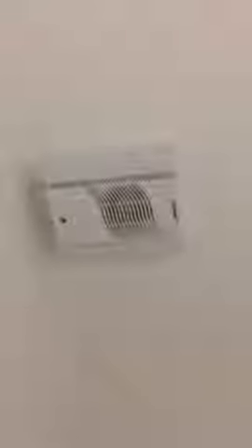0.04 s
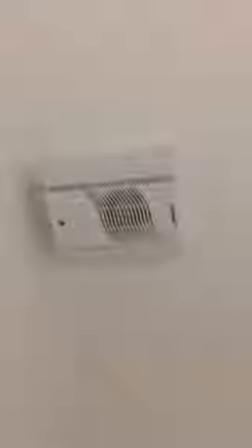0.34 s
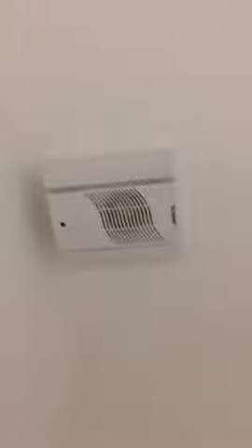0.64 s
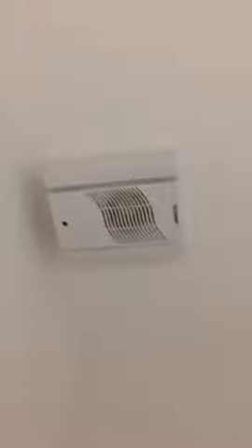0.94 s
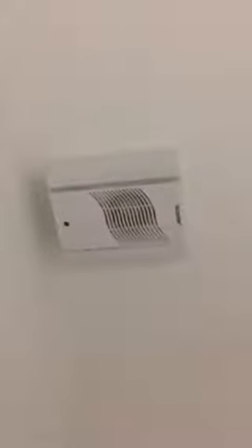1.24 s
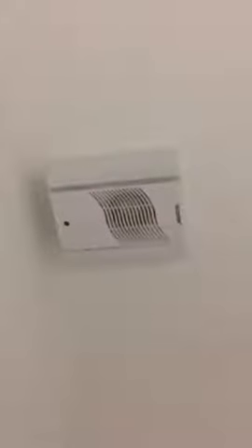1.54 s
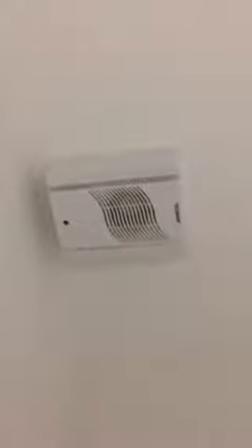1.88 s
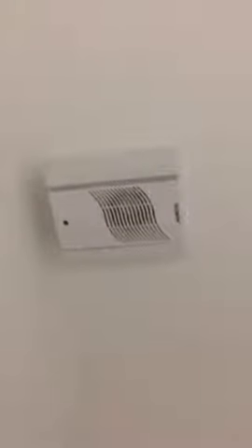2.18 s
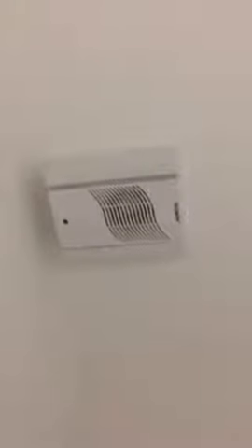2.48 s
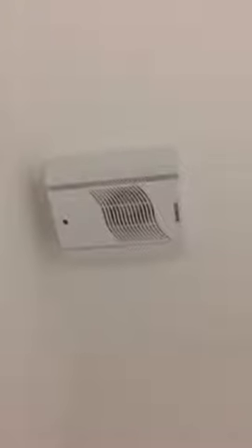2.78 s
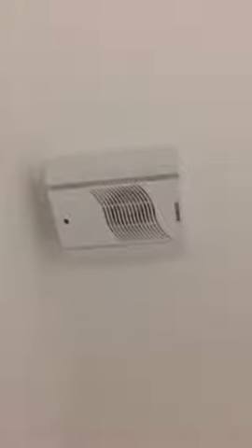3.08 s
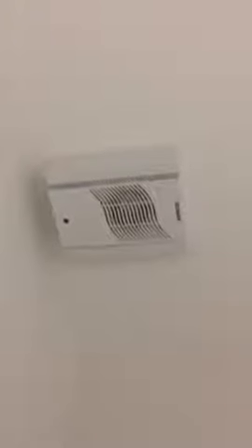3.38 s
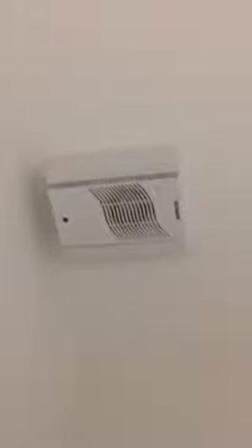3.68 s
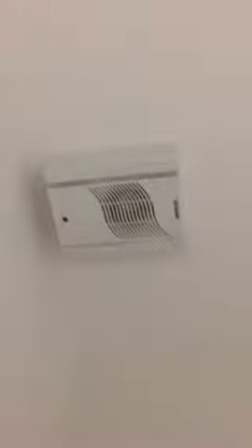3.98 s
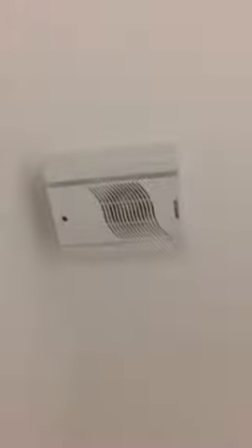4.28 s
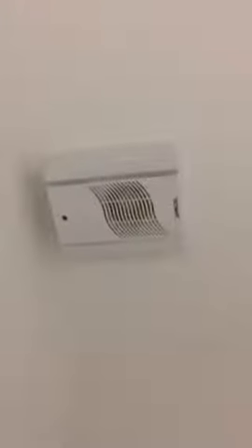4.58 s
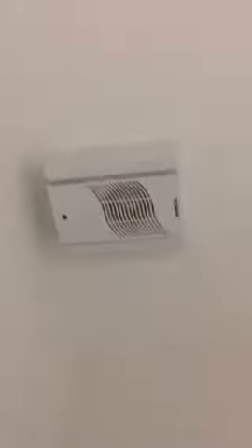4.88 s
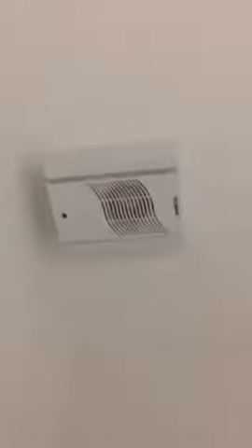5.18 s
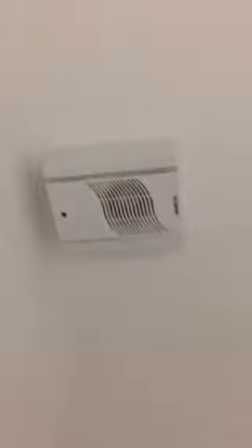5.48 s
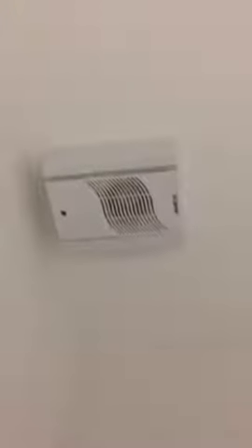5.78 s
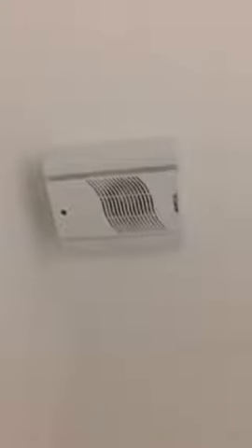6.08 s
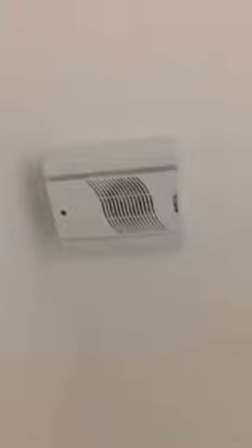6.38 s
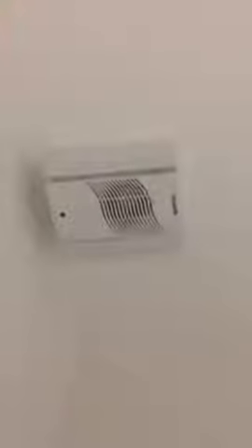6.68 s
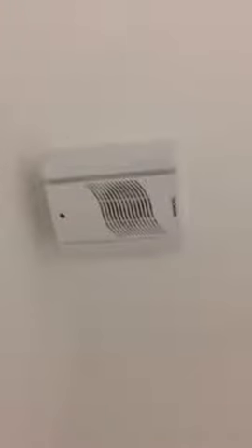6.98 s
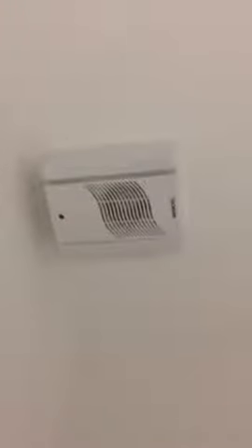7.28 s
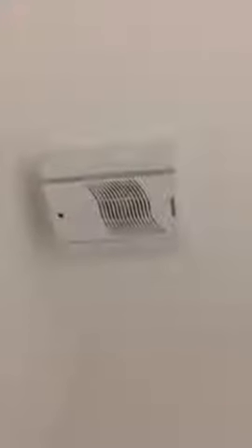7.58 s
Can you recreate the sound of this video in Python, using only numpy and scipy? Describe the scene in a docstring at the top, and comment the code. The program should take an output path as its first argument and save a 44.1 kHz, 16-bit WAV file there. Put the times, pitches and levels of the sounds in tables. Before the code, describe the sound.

Plastic vent flaps clack open and shut irregularly in the wind, echoing in a small room over a faint duct rumble.

```python
"""Plastic flaps clack as wind blows them open and they drop shut in the duct of an idle ceiling fan. Each hit
rings the flaps and the fan housing, and echoes in a small hard room. Now and then a flap bounces, or its dry
hinge gives a faint squeak. The air in the duct thuds at gusts and at a hard slam, and gusts rumble there over a
quiet hiss and a faint building hum."""
import sys
import numpy as np
from scipy import signal
from scipy.fft import rfft, irfft, dct
from scipy.io import wavfile
from scipy.ndimage import uniform_filter1d

SR = 44100
rng = np.random.default_rng(int(sys.argv[2]) if len(sys.argv) > 2 else 0)


def int16_out(signal):
    """Quantize to a 16-bit WAV file."""
    q = np.round(np.clip(np.atleast_2d(signal).T, -1, 1) * 32767)
    wavfile.write(sys.argv[1], SR, q.astype(np.int16))


N = 346185


def gain_of(db):
    """Turns decibels into a number to multiply by."""
    return 10 ** (np.asarray(db) / 20)


def unit_level(x):
    """Scales a signal to an average power of 1."""
    return x / np.sqrt(np.mean(x ** 2) + 1e-20)


def curve_at(points, hz):
    """Reads a curve through (pitch_hz, value) points, with octaves evenly spaced."""
    point_hz, value = np.transpose(points)
    return np.interp(np.log(hz + 1), np.log(point_hz + 1), value)


def add(mix, start_s, sound):
    """Mixes a sound in at its start time."""
    part = mix[max(round(start_s * SR), 0):][:len(sound)]
    part += sound[:len(part)]


def noise(colour):
    """Steady noise of power 1, shaped by (pitch_hz, level_db) points."""
    shape = gain_of(curve_at(colour, np.fft.rfftfreq(N, 1 / SR)))
    return unit_level(irfft(rfft(rng.standard_normal(N)) * shape, N))


def hiss_and_hum(hiss_db=-77.5, hum_db=-78, hum_hz=280):
    """A steady hiss and the building's faint one-note hum."""
    # tone of the hiss: pitch_hz, relative_db
    hiss_colour = [(100, 7), (1000, -27), (2000, 3), (4000, 1), (8000, -2), (13000, -4.5), (15500, -5.5)]
    hum = gain_of(hum_db) * np.sin(2 * np.pi * hum_hz * np.arange(N) / SR)
    return hum + gain_of(hiss_db) * noise(hiss_colour)


def wind(calm_rumble_db=-63, calm_buffet_db=-75.5):
    """Wind rumbles and buffets in the duct; in a gust the buffeting grows faster."""
    # gusts that swell and die away: peak_s, rise_db, half_length_s
    gusts = [(0.0, 4.5, .15), (1.447, 3, 0.54), (3.347, 8, 0.3), (4.8, 1, .25), (5.96, 6, 0.28),
             (6.82, 2.5, 0.13)]
    # tone of the rumble: pitch_hz, relative_db
    rumble_colour = [(20, -24), (40, -9), (55, -2), (68, 6.5), (85, -8.5), (108, -2), (150, -9), (220, -13),
                     (290, -11.5), (500, -14.5), (800, -24.5), (1500, -29), (4000, -56.5)]
    buffet_colour = [(40, -15.5), (110, -1.5), (230, 0.5), (450, -10), (1500, -45.0)]
    t = np.arange(N) / SR
    gust_db = sum(rise_db * np.exp(-((t - peak_s) / half_s) ** 2) for peak_s, rise_db, half_s in gusts)
    rumble = gain_of(calm_rumble_db + gust_db) * noise(rumble_colour)
    buffet = gain_of(calm_buffet_db + 1.5 * gust_db) * noise(buffet_colour)
    return rumble + buffet


def thuds(rise_s=0.004, fade_s=0.32):
    """A gust's jump in pressure, or a hard slam of a flap, sets the air in the duct swinging."""
    # thumps of air: start_s, level_db, pitch_hz
    thumps = [(.9, -50, 65), (3.055, -45, 78), (3.196, -43.5, 64), (3.249, -43.5, 68.2),
              (3.284, -44.5, 120), (3.31, -44, 70.3), (5.683, -33, 106.6), (5.926, -38.5, 74)]
    out, t = np.zeros(N), np.arange(SR // 2) / SR
    swing = gain_of(-60 * t / fade_s) * (1 - np.exp(-t / rise_s))
    for start_s, level_db, pitch_hz in thumps:
        add(out, start_s, -gain_of(level_db) * swing * np.sin(2 * np.pi * pitch_hz * t))
    return out


def hinge_squeaks(gain_db=-1.5, overtone_db=-14, rub_db=-7, fall_hz_per_s=723, echo_s=0.51):
    """A dry hinge scrapes out a short, falling note as the flap swings; the room smears it."""
    # squeaks: start_s, length_s, relative_db, pitch_hz
    squeaks = [(0.0, 0.036, -58, 1015), (1.419, 0.084, -68, 1161), (1.863, 0.079, -61, 975),
               (4.003, 0.035, -65.5, 1307), (4.062, 0.043, -67.5, 908), (4.374, 0.09, -66.5, 1262),
               (4.437, 0.066, -61, 723), (5.575, 0.11, -62.5, 1118), (7.068, 0.1, -60, 1012)]
    out, tail_t = np.zeros(N), np.arange(SR // 2) / SR
    rubbing = noise([(300, 2), (700, 7.0), (1400, -1), (2400, -7.0), (5000, -18), (12000, -23)])
    for start_s, length_s, relative_db, pitch_hz in squeaks:
        n = int(length_s * SR)
        falling_hz = pitch_hz - fall_hz_per_s * np.arange(n) / SR
        # the hinge sticks and slips, so the pitch wavers
        waver = 0.08 * unit_level(uniform_filter1d(rng.standard_normal(SR), size=100))[:n]
        phase = 2 * np.pi * np.cumsum(falling_hz * (1 + waver)) / SR
        rub = gain_of(rub_db) * rubbing[int(start_s * SR):][:n]
        note = np.sin(phase) + gain_of(overtone_db) * np.sin(2 * phase) + rub
        tail = rng.standard_normal(len(tail_t)) * gain_of(-60 * tail_t / echo_s)
        tail[0] = np.linalg.norm(tail)  # the direct sound is as strong as its echo
        heard = signal.fftconvolve(note * signal.windows.tukey(n, 0.2), tail)
        add(out, start_s, gain_of(relative_db + gain_db) * heard * np.sqrt(n) / np.linalg.norm(heard))
    return out


def scatter(size=32768):
    """Tightly packed random reflections of even power."""
    return dct(rng.choice([-1., 1.], (size // 1024, 1024)), norm="ortho").ravel()


def room_echoes(pattern, chatter_s, early_s=0.014):
    """The walls return a hit as early echoes, then a tail that fades at its own pace in each band."""
    # the room's bands: pitch_hz, fade_s (time to fall 60 dB), build_up_s, early_db
    room = [(103, 0.19, 0.0083, -28), (387, 0.45, 0.004, 5.5), (990, 0.49, 0.0026, 1.5),
            (1840, 0.43, 0.00023, -5), (4770, 0.44, 0.00039, 2.5), (8700, 0.35, 0.00044, 3.5),
            (15000, 0.2, 0.00072, -1.5)]
    t, hz = np.arange(len(pattern)) / SR, np.fft.rfftfreq(len(pattern), 1 / SR)
    spectrum, out = rfft(pattern), np.zeros(len(t))
    for (_, fade_s, build_up_s, early_db), weights in zip(room, np.eye(len(room))):
        band_shape = [(row[0], weight) for row, weight in zip(room, weights)]
        band = irfft(spectrum * curve_at(band_shape, hz))
        early = gain_of(early_db) * np.exp(-(t / (early_s + chatter_s)) ** 2)
        tail = gain_of(-60 * t / fade_s)
        out += band * np.hypot(early, tail) * (1 - np.exp(-t / build_up_s))
    return out * np.clip(t / max(chatter_s, 1e-4), 0, 1) ** 0.5  # swells while the flap settles


def ring(colour, touch, notes, size=8192):
    """A struck body rings at its own notes, over a broad tone tilted by how it is hit."""
    hz = abs(np.fft.fftfreq(size, 1 / SR))
    peaks_db = sum(db / (1 + (2 * (hz - pitch) / width) ** 2) for pitch, width, db in notes)
    gain = gain_of(curve_at(colour, hz) + curve_at(touch, hz) + peaks_db)
    spectrum = np.exp(np.conj(signal.hilbert(np.log(gain))))  # nothing sounds before the hit
    return np.fft.ifft(spectrum).real[:size // 2]


def clacks(hits, colour, flap_notes, gain_db, lead_s, base_ring, rattle_db):
    """Each hit rings flap and housing. body_db is high when the housing takes the blow,
    bright_db when the flap's rim lands first."""
    # ringing notes of the duct and fan housing: pitch_hz, width_hz, boost_db
    housing_notes = [(113.5, 57, 12.5), (182, 38, 11.5), (225, 23, 12.5), (324.6, 18, 12.5),
                     (347, 35, 13.5), (417, 20, 7), (492.4, 41, 10.5), (630, 45, 8), (730, 36, 8),
                     (811, 10, 10), (885.8, 80, 14.5), (968, 24, 3.5), (1044, 15, 5.5), (1533, 25, 7.5),
                     (1632, 20, 12.5), (3130, 40, 5)]
    out, shared_paths = np.zeros(N), scatter()
    alike = 0.45  # hits on the same spot share some paths through the room
    for start_s, force_db, body_db, bright_db, chatter_s in hits:
        hollow_db = rattle_db + 0.06 * (force_db + 29)  # harder hits rattle the hollow housing more
        touch = [(900, body_db), (1400, hollow_db), (2400, 0.69 * bright_db),
                 (4000, 0), (10000, 1.02 * bright_db)]
        ring_scale = base_ring + 0.0632 * bright_db  # landing on the rim rings; landing flat is duller
        # a loose flap never lands the same way twice, so its notes shift a little
        shifts = rng.standard_normal((len(flap_notes), 2))
        notes = [(hz * (1 + 0.003 * pitch_shift), width, ring_scale * boost + 3.5 * level_shift)
                 for (hz, width, boost), (pitch_shift, level_shift) in zip(flap_notes, shifts)]
        body = ring(colour, touch, housing_notes + notes)
        pattern = alike * shared_paths + np.sqrt(1 - alike ** 2) * scatter()
        clack = signal.fftconvolve(room_echoes(pattern, chatter_s), body)
        add(out, start_s - lead_s, gain_of(force_db + gain_db) * clack)
    return out


def flaps_open():
    """Wind throws the flaps against their open stop."""
    # hits on the stop: start_s, force_db, body_db, bright_db, chatter_s
    hits = [(1.0855, -36.5, -4, 3.5, 0.0087), (1.092, -36, 0.5, -6.5, 0.0094),
            (1.0979, -34.5, 1.5, -2, .0036), (2.0105, -41, -0.5, 1, 0.0052),
            (3.039, -35.5, 2.5, 3.5, .0056), (3.2445, -39, 4.5, 4, 0.0041), (5.6831, -16, 0, -6, 0.0043),
            (5.7194, -22.5, -7, -3, 0.0046), (6.0138, -29.5, 3, -1.5, 0.0077),
            (7.1884, -28, -.5, -0.2, 0.012)]
    # broad tone of a hit: pitch_hz, relative_db
    colour = [(30, 2), (80, 5.5), (300, -3), (550, 0), (860, 1), (1200, -5), (1750, -5.5), (3000, -5.5),
              (6000, -9.5), (10000, 0), (15000, -2.5)]
    # notes of an open flap: pitch_hz, width_hz, boost_db (scaled for each hit)
    notes = [(1996, 155, 11), (2640, 260, 10), (3122, 170, 6), (3380, 200, 5), (3985, 72, 6),
             (4177, 160, 10), (4520, 107, 4), (4841, 160, 5), (5340, 190, 7), (5743, 267, 8),
             (6242, 244, 7), (6918, 209, 6), (7631, 190, 6), (12725, 147, 5)]
    return clacks(hits, colour, notes, gain_db=-10, lead_s=0.00091, base_ring=1.2, rattle_db=3.5)


def flaps_shut():
    """The flaps drop onto their seat and sometimes bounce."""
    # landings and bounces: start_s, force_db, body_db, bright_db, chatter_s
    hits = [(0.0014, -39.5, -4, -3, 0.00085), (1.576, -37, 0, -1.2, .003),
            (1.7413, -53.5, 2.5, -2.5, .0026), (2.8115, -30.5, 0, 1, 0.0023), (2.8682, -34.5, 1, -2, .0013),
            (3.468, -29.5, 1, -2, 0.0013), (4.2408, -31.5, -1.5, -0.3, .0024),
            (4.2986, -40.5, 1, 1.4, 0.004), (4.676, -51, -0.5, -2.5, .0018), (4.807, -59, 1, 0, .003),
            (6.2664, -38.5, 2, 1.1, 0.0019), (6.7268, -32, -0.9, -0.2, 0.0027), (6.892, -49, 1.5, 0, .0028),
            (7.6226, -55.5, -1.5, 2, 0.0056), (7.6409, -46, 2, -1.5, 0.0082)]
    # broad tone of a landing: pitch_hz, relative_db
    colour = [(30, -12), (80, 2.5), (300, -2.5), (550, 0.5), (860, 0.5), (1200, -7.5), (1750, -9.5),
              (3000, -11.5), (6000, -11), (10000, -7), (15000, -10)]
    # notes of a shut flap: pitch_hz, width_hz, boost_db (scaled for each hit)
    notes = [(1907, 219, 13), (2311, 210, 12), (2578, 135, 6), (2788, 119, 8), (3101, 230, 12),
             (3442, 300, 10), (3822, 130, 8), (4151, 208, 6), (5247, 77, 8), (5780, 432, 8), (6476, 140, 5),
             (7971, 240, 7), (8466, 557, 4)]
    return clacks(hits, colour, notes, gain_db=-9, lead_s=0.0015, base_ring=0.84, rattle_db=6)


def scene():
    """Flaps, hinges and the air in the duct, mixed into one channel."""
    return (flaps_open() + flaps_shut() + hinge_squeaks() + thuds() + wind() + hiss_and_hum())[None]


def record(dry):
    """Cuts away the very highest treble."""
    cutoff_hz = 15400
    low_pass = signal.firwin(511, cutoff_hz, window=("kaiser", 8), fs=SR)
    return signal.oaconvolve(dry, low_pass[None], "same")


dry = scene()
out = record(dry)
int16_out(out)
```